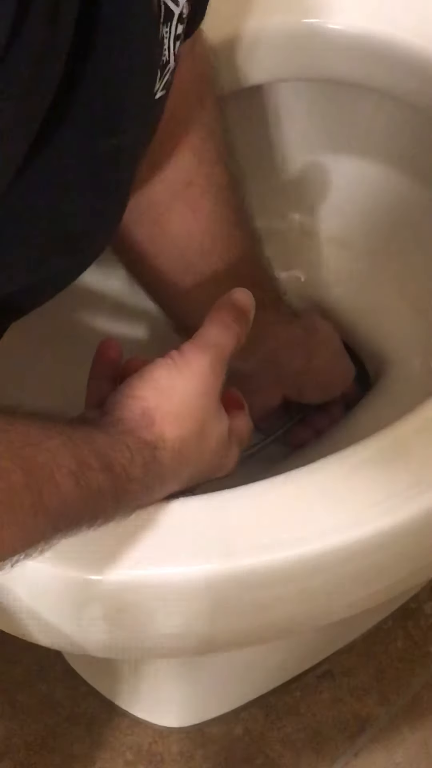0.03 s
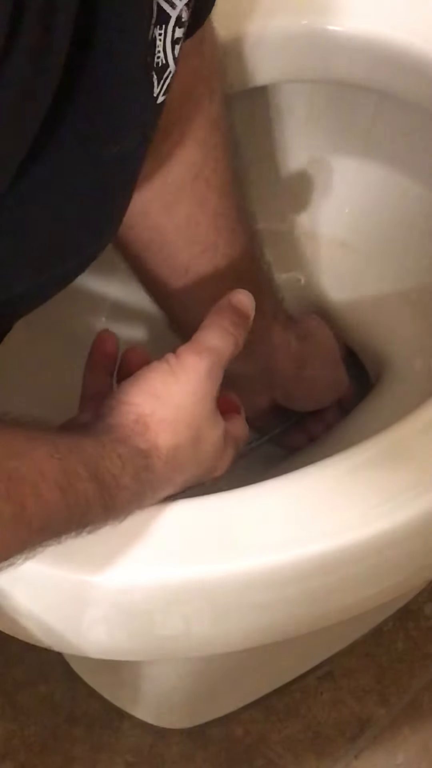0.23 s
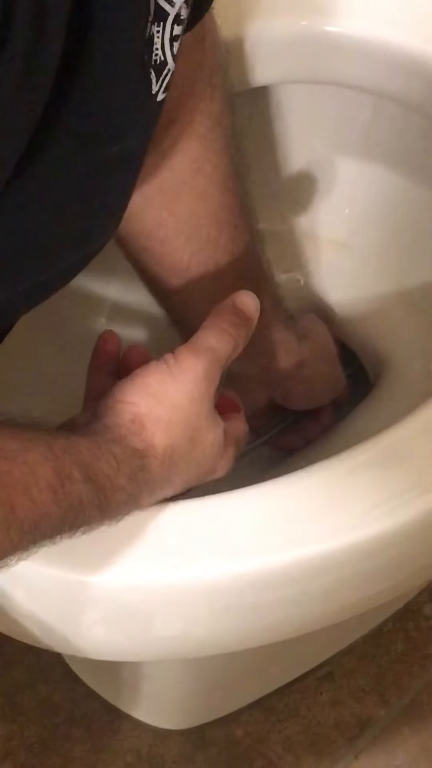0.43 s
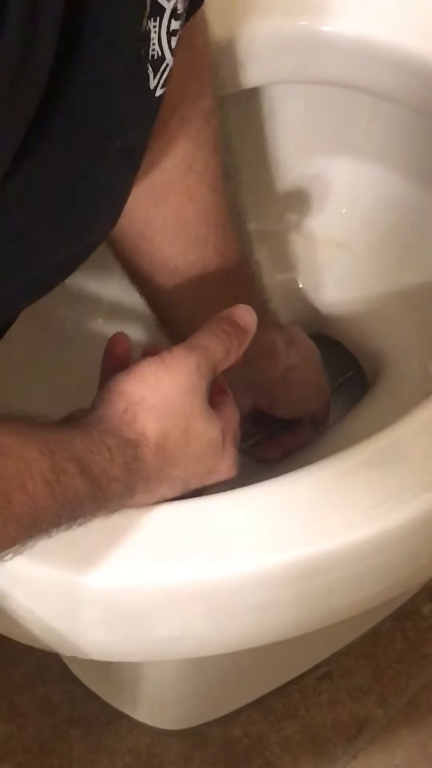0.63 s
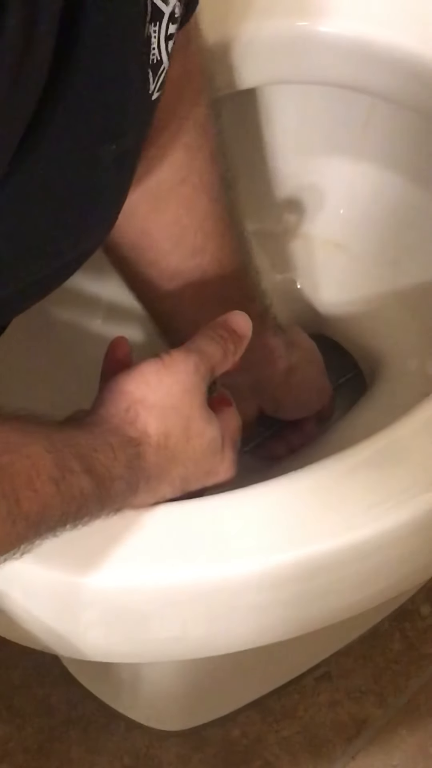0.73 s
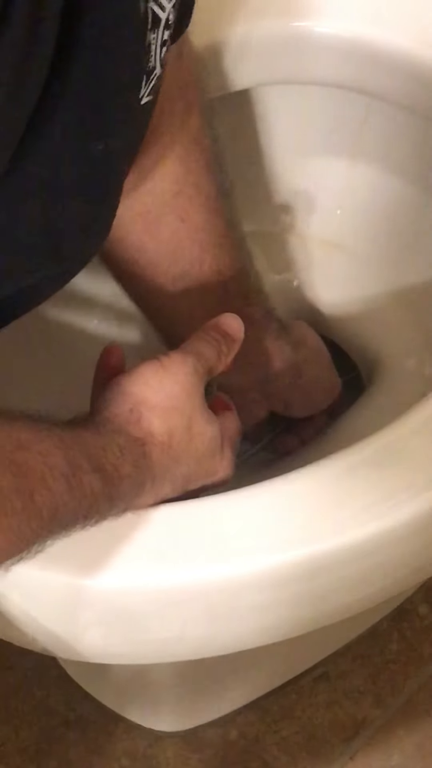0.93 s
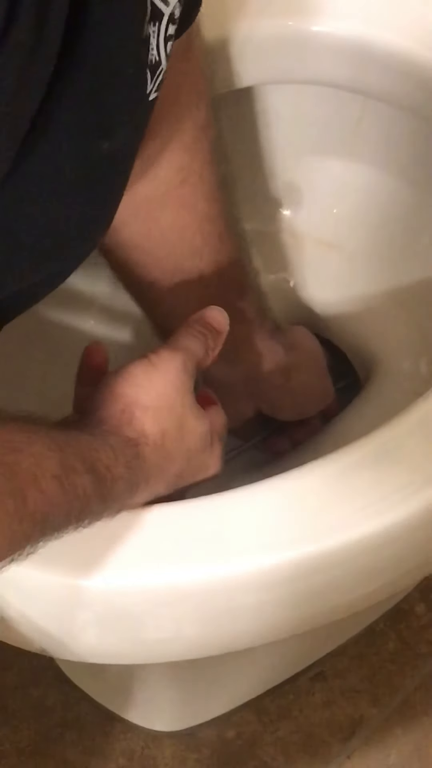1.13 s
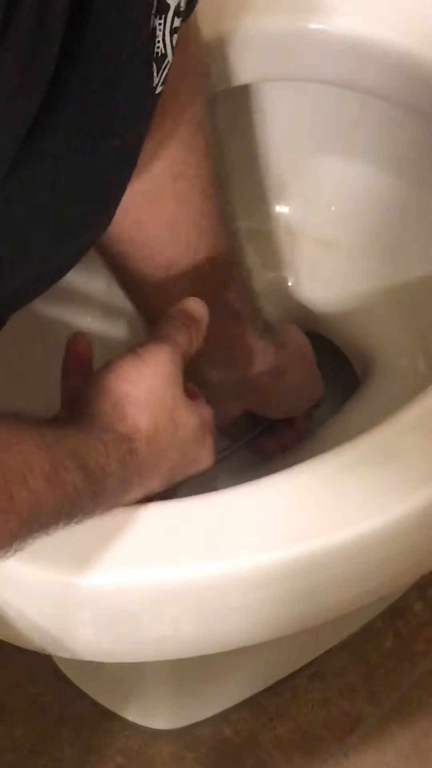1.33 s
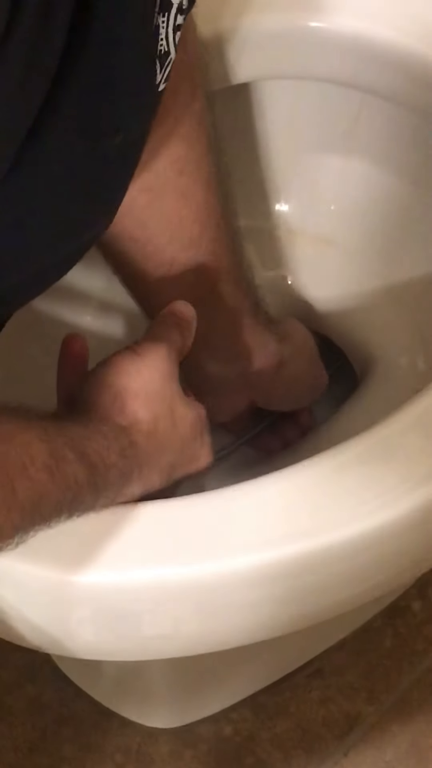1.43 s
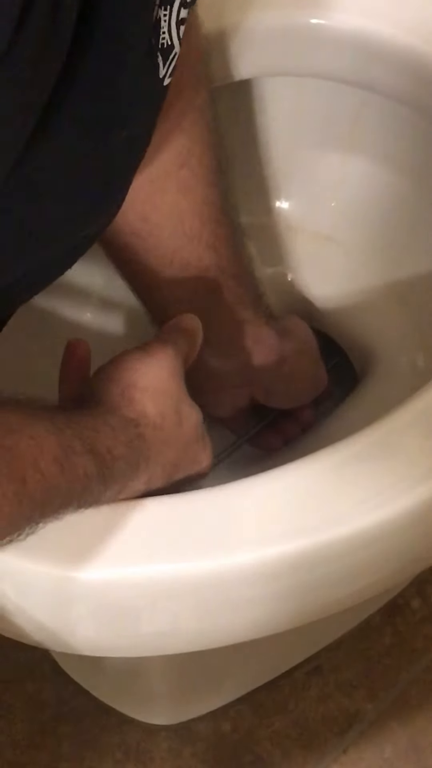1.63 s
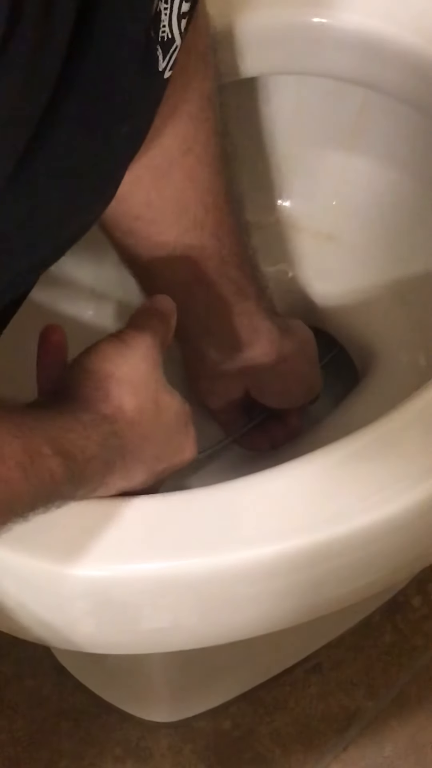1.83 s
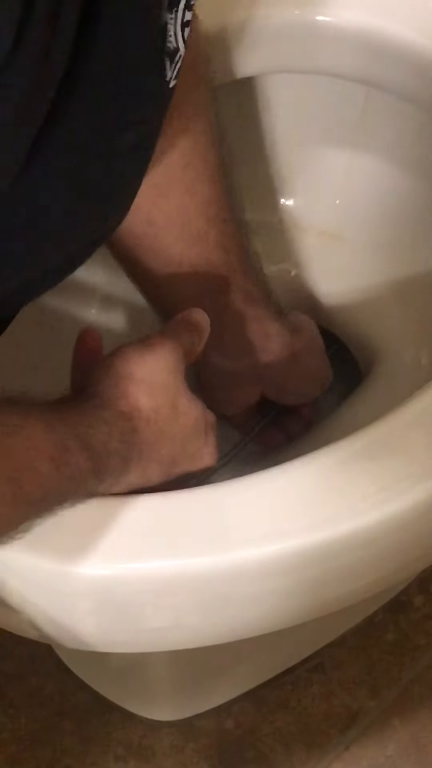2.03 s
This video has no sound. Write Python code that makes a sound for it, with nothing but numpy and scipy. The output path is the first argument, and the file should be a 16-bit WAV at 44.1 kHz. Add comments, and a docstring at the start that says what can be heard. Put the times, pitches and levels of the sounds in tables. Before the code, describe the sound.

A metal drain snake knocks and rattles in a porcelain toilet bowl, with faint scrapes.

```python
"""A steel drain snake knocks, bounces and ticks in a porcelain toilet bowl, worked by hand.
Each knock clatters in the bowl and rings the coil and the porcelain. Between knocks the coil
scrapes the glaze in tiny slips. Hands rub on the cable, and a few pushes thud in the drain.
The room is small, quiet and hard-walled, with a low rumble and faint hiss."""
import sys
import numpy as np
from scipy import signal
from scipy.fft import rfft, irfft
from scipy.io import wavfile
from scipy.ndimage import uniform_filter1d

SR = 44100
rng = np.random.default_rng(int(sys.argv[2]) if len(sys.argv) > 2 else 0)


def transcribe(signal):
    """Save signal, clipped to [-1, 1], as a 16-bit WAV file at the path in sys.argv[1]."""
    frames = np.atleast_2d(signal).T
    limited = np.clip(frames, -1, 1)
    pcm = np.round(limited * 32767).astype(np.int16)
    wavfile.write(sys.argv[1], SR, pcm)


N = 92610


def amp(db):
    """Decibels to gain."""
    return 10 ** (np.asarray(db) / 20)


def unit(x):
    """Scale to rms 1."""
    return x / np.sqrt(np.mean(x ** 2) + 1e-20)


def curve_at(points, hz):
    """Interpolate on a log-frequency axis."""
    freq_hz, value = np.transpose(points)
    return np.interp(np.log(hz + 1), np.log(freq_hz + 1), value)


def add(mix, start_s, sound):
    """Mix a sound in at start_s."""
    part = mix[max(round(start_s * SR), 0):][:len(sound)]
    part += sound[:len(part)]


def gate(start_s, length_s, ramp_s):
    """Trapezoid envelope on the scene's time axis."""
    t = np.arange(N) / SR
    return np.clip(np.minimum(t - start_s, start_s + length_s - t) / ramp_s, 0, 1)


def colour(x, *curves, size=2048):
    """Minimum-phase filter from summed dB curves."""
    hz = abs(np.fft.fftfreq(size, 1 / SR))
    log_gain = np.log(amp(sum(curve_at(curve, hz) for curve in curves)))
    taps = np.fft.ifft(np.exp(np.conj(signal.hilbert(log_gain)))).real
    return signal.fftconvolve(x, taps[:size // 2])[:len(x)]


def ring(pitches_hz, levels_db, t60s_s, t, rise_s=0.0013):
    """Decaying modes of a struck object."""
    modes = zip(pitches_hz, levels_db, t60s_s)
    partials = sum(amp(db - 60 * t / t60_s) * np.sin(2 * np.pi * hz * t) for hz, db, t60_s in modes)
    return (1 - np.exp(-t / rise_s)) * partials


# Room decay: freq_hz, t60_s
ROOM_DECAY = [(100, .5), (500, 0.42), (1500, 0.28), (4000, 0.27), (8000, 0.26), (15000, 0.2)]
# Room tail spectrum: freq_hz, gain_db
ROOM_SPECTRUM = [(100, 10), (600, -0.5), (1500, -3), (4000, -8), (12000, -8)]


def room(x, wet_db=0, build_s=0.0053, size=256):
    """Direct sound plus hard-wall reflections, each band decaying at its own rate."""
    hz, t, noise = signal.stft(rng.standard_normal(SR // 2), SR, nperseg=size)
    t60_s = curve_at(ROOM_DECAY, hz)[:, None]
    tail_db = wet_db + curve_at(ROOM_SPECTRUM, hz)[:, None] - 60 * t / t60_s
    energy_norm = np.sqrt(np.log(1e6) / (t60_s * SR))
    response = signal.istft(noise * amp(tail_db) * energy_norm, SR, nperseg=size)[1]
    response *= np.minimum(np.arange(len(response)) / SR / build_s, 1) ** 2
    response[0] = 1  # direct path
    return signal.fftconvolve(x, response)


# Room noise spectrum: freq_hz, relative_db
ROOM_TONE_SPECTRUM = [(21, -30.5), (36, 0), (226, -10), (349, -22.5), (386, -11.5), (524, -17), (769, -19),
                      (1100, -26.5), (1220, -23.5), (2080, -24.5), (2300, -27.5), (14800, -39),
                      (16000, -56)]


def room_tone(rms_db=-61):
    """Low rumble and faint hiss of the quiet room."""
    gain = amp(curve_at(ROOM_TONE_SPECTRUM, np.fft.rfftfreq(N, 1 / SR)))
    return amp(rms_db) * unit(irfft(rfft(rng.standard_normal(N)) * gain, N))


# Grip shifts: start_s, length_s, gain_db
HAND_RUBS = [(0.063, 0.16, -65.5), (0.264, 0.155, -63.5), (1.267, 0.11, -78), (1.529, 0.117, -74),
             (1.641, 0.14, -60)]
# Skin friction spectrum: freq_hz, gain_db
RUB_SPECTRUM = [(30, -19), (90, 9.5), (250, 14.5), (450, 13.5), (650, 10.5), (1000, -4.5), (2000, -13.5),
                (8000, -32)]


def hand_rubs():
    """Dull friction of skin on cable and bowl as the grip shifts."""
    grip = sum(amp(db) * gate(start_s, length_s, ramp_s=0.015) for start_s, length_s, db in HAND_RUBS)
    return room(colour(rng.standard_normal(N) * grip, RUB_SPECTRUM))[:N]


# Low thuds, plus the two lowest porcelain modes near 410 and 540 Hz: start_s, pitch_hz, level_db, t60_s
LOW_THUDS = [(0.200, 94, -37.5, 0.25), (0.212, 156.5, -36.5, 0.17), (0.222, 234, -43, 0.3),
             (0.222, 283, -44.5, 0.31), (0.212, 419.6, -41.5, 0.41), (0.212, 535, -38, 0.3),
             (0.857, 251, -51, 0.14), (0.857, 406.6, -43.5, .3), (0.860, 528, -42.5, 0.3364),
             (1.234, 250, -46.5, 0.16), (1.400, 542.6, -52, 0.47), (0.502, 541, -51.5, 0.32),
             (1.848, 243.6, -39, 0.29)]


def low_thuds(rise_s=0.0091):
    """Pushes give low thuds and ring the two lowest modes of the porcelain."""
    out, t = np.zeros(N), np.arange(SR // 2) / SR
    for start_s, pitch_hz, level_db, t60_s in LOW_THUDS:
        envelope = np.minimum(t / rise_s, 1) * amp(level_db - 60 * t / t60_s)
        add(out, start_s, envelope * np.sin(2 * np.pi * pitch_hz * t))
    return out


# Porcelain modes, one list each: pitch_hz, relative_db, t60_s
BOWL_MODE_HZ = [782, 1021, 1089, 1180, 1267, 1337, 1400, 1461, 1580, 1627]
BOWL_MODE_DB = [-21, -11, -11, -14, -5.5, -8, -12.5, 2, -6, -10]
BOWL_MODE_T60_S = [0.11, 0.11, 0.084, 0.08, 0.13, 0.22, 0.18, 0.073, 0.11, 0.15]


def bowl_ring(t, purity=1):
    """Ringing porcelain; purity above 1 makes the main mode stand out."""
    return ring(BOWL_MODE_HZ, purity * np.array(BOWL_MODE_DB), BOWL_MODE_T60_S, t)


def contact_spot(peak_hz, peak_db, half_width_hz=150, spread_db=4.5, step_hz=170.3, treble_hz=4520):
    """Each contact spot favours one resonance among random treble ones. Rows: freq_hz, gain_db."""
    hz = np.arange(120) * step_hz
    ripple_db = spread_db * np.minimum(hz / treble_hz, 1) * rng.standard_normal(len(hz))
    resonance_db = peak_db / (1 + ((hz - peak_hz) / half_width_hz) ** 2)
    return np.transpose([hz, ripple_db + resonance_db])


# Coil strokes on the glaze: start_s, length_s, gain_db
COIL_SCRAPES = [(0.087, 0.095, -61.5), (0.463, 0.075, -58.5), (0.532, 0.066, -62.5), (0.677, .10, -69),
                (0.816, 0.054, -62.5), (1.31, 0.13, -62.5), (1.442, 0.11, -67.5), (1.568, 0.052, -67),
                (1.757, 0.037, -66), (1.835, 0.04622, -59), (1.928, 0.04306, -67.5), (2.052, 0.071, -65)]
# Steel-on-glaze friction spectrum: freq_hz, gain_db
SCRAPE_SPECTRUM = [(100, 9), (600, 14.5), (2200, 1.5), (3800, 6.5), (7000, 1), (10500, -1.5), (15000, -1)]


def coil_scrapes(slips_per_s=2500, spread_db=2, ring_db=-10):
    """Tiny slips of the coil hiss on the glaze and faintly ring the bowl."""
    slips = rng.standard_normal(N) * (rng.random(N) < slips_per_s / SR)
    slips = unit(slips * amp(spread_db * np.minimum(rng.exponential(1, N), 4)))
    bowl = bowl_ring(np.arange(SR // 3) / SR)
    bowl /= np.linalg.norm(bowl)
    out = np.zeros(N)
    for start_s, length_s, gain_db in COIL_SCRAPES:
        stroke = slips * amp(gain_db) * gate(start_s, length_s, ramp_s=0.0094)
        out += colour(stroke, SCRAPE_SPECTRUM, contact_spot(peak_hz=3800, peak_db=-0.5))
        out += amp(ring_db) * signal.fftconvolve(stroke, bowl)[:N]
    return room(out)[:N]


# Steel coil modes, one list each: pitch_hz, relative_db, t60_s
COIL_MODE_HZ = [1022, 1970, 2243, 2466, 2717, 3400, 3590, 3705, 4335, 6150, 6820]
COIL_MODE_DB = [-12, -11.5, -13, -22, -14, -12, -7.5, -15, -9.5, -17, -18]
COIL_MODE_T60_S = [0.094, .08, .14, 0.2, 0.18, .11, .07, 0.11, .06, .07, .08]


def coil_ring(t):
    """Brief ring of the struck steel coil."""
    return ring(COIL_MODE_HZ, COIL_MODE_DB, COIL_MODE_T60_S, t)


# Spectrum of reflections in the bowl: freq_hz, gain_db
CLATTER_SPECTRUM = [(40, -22.5), (140, -9.5), (260, 6), (480, 2.5), (900, 10.5), (1600, 8), (1850, 5),
                    (3000, 7), (3600, 11.5), (4500, 7), (5000, 3.5), (6400, 5.5), (8000, 0), (9600, 1),
                    (10400, -6.5), (12300, 1.5), (15500, -8)]


def bowl_clatter(t, contact_s, hardness, tick_hz, peak_db, t60_s=0.053):
    """Dense reflections in the bowl build during contact, then decay."""
    envelope = np.minimum(t / contact_s, 1) * amp(-60 * np.maximum(t - contact_s, 0) / t60_s)
    burst = rng.standard_normal(len(t)) * envelope
    for _ in range(3):  # flatten the spectrum, keep the envelope
        spectrum = rfft(burst)
        band_rms = np.sqrt(uniform_filter1d(abs(spectrum) ** 2, 60) + 1e-12)
        burst = irfft(spectrum / band_rms, len(t)) * np.linalg.norm(envelope)
        burst = np.clip(burst, -3 * envelope, 3 * envelope)
    return colour(burst, CLATTER_SPECTRUM, hardness, contact_spot(tick_hz, peak_db))


# Cable hits on the bowl: start_s, contact_s, body_db, clack_db, edge_db, top_db,
# tick_hz, tick_peak_db, ring_db, ring_lag_s
CABLE_KNOCKS = [ (0.1848, .004, -64, -62.5, -41.5, -49.5, 4020, 21, -33, 0.00292),
                (0.1940, .003, -31.5, -32.5, -24, -25.5, 6830, 7, -13, 0.0032085),
                (0.2050, .002, -43, -33, -60, -46, 4350, 7, -38, .0003),
                (0.2105, .002, -33, -32, -36, -34, 3389, 12, -27.5, 0.00022),
                (0.384, .002, -66, -87, -88, -81, 3600, -8, -49.5, 0.0015),
                (0.452, .002, -70.5, -62, -56.5, -46, 6201, 8.5, -64, .002),
                (0.4750, .002, -52, -44, -42.5, -35.5, 4277, 12, -48, 0.0018),
                (0.4968, 0.004463, -57, -42, -45, -41, 3830, 2, -37, 0.0058),
                (0.5942, .002, -62, -61, -54.5, -44.5, 4600, 12, -55, 0.002276),
                (0.674, 0.003321, -61, -65, -57.5, -52.5, 4200, 6, -63, 0.002072),
                (0.703, 0.003503, -82, -70, -55, -54, 5830, 7, -75.5, .002),
                (0.7386, 0.0031, -63, -64, -56, -56, 5800, 9, -58, 0.0054),
                (0.802, 0.0098, -73, -69, -60.5, -58, 3900, 3, -68, 0.0022),
                (0.8548, .002, -25, -29, -29.5, -28, 3845, 6.5, -25, .003),
                (0.971, .002, -79, -58, -66, -53, 3700, 5, -74, .002),
                (1.1742, .002, -52.5, -69.5, -58, -54, 5602, 8, -63.5, 0.0021),
                (1.205, 0.0041, -44, -51.5, -42, -40.5, 3674, 6.5, -47.5, 0.016),
                (1.2311, 0.0026, -33.5, -26, -31, -28.5, 3680, 8.5, -47, 0.0014),
                (1.3495, .003, -68, -59, -57, -55, 4000, 11, -54.5, 0.0085),
                (1.372, 0.0058, -75, -47, -55, -52, 4360, 10, -64, 0.00194),
                (1.398, .003, -46.5, -50, -54, -54, 4140, 3.5, -46.5, 0.0068),
                (1.506, 0.0044, -66.5, -59, -62, -53.5, 3694, 8, -58, 0.0064),
                (1.5537, .002, -51.5, -53, -45, -45.5, 4210, 6, -55, 0.015),
                (1.6972, 0.0058, -46, -47.5, -48, -36, 3460, 8, -71, 0.0025),
                (1.709, 0.002, -40.5, -42, -40, -41, 5800, 14, -43.5, .010),
                (1.848, 0.0026, -60, -59, -57, -50, 4240, 12, -74, 0.0022),
                (1.914, 0.0041, -49.5, -67.5, -63, -61.5, 3600, 1, -49, 0.0055),
                (1.9597, .002, -43, -54, -50.5, -47.5, 4397, 8, -48, 0.011),
                (2.0460, .002, -80, -60, -57.5, -47.5, 5950, 4, -81, 0.001892), ]


def cable_knocks(hard_db=-31, purity_per_db=0.0279):
    """Each hit clatters and rings coil and porcelain; softer hits ring the bowl more purely."""
    out, t = np.zeros(N), np.arange(SR // 3) / SR
    bands_hz = (1000, 2180, 4520, 8000)  # body, clack, edge, top
    coil = coil_ring(t)
    for start_s, contact_s, *bands_db, tick_hz, tick_peak_db, ring_db, ring_lag_s in CABLE_KNOCKS:
        hardness = list(zip(bands_hz, bands_db))
        hit = bowl_clatter(t, contact_s, hardness, tick_hz, tick_peak_db)
        _, clack_db, edge_db, _ = bands_db
        add(hit, contact_s / 2, amp((clack_db + edge_db) / 2) * coil)
        add(out, start_s, room(hit))
        purity = 1.5 + purity_per_db * max(hard_db - ring_db, 0)
        bowl = amp(ring_db) * bowl_ring(t, purity)
        add(out, start_s + ring_lag_s, room(bowl, wet_db=-5.5))
    return out


def scene():
    """All sources, mono."""
    return (cable_knocks() + low_thuds() + coil_scrapes() + hand_rubs() + room_tone())[None]


def record(dry):
    """Low-pass at 16 kHz."""
    lowpass = signal.firwin(301, 16000, window=("kaiser", 9), fs=SR)
    return signal.oaconvolve(dry, lowpass[None], "same")


dry = scene()
out = record(dry)
transcribe(out)
```